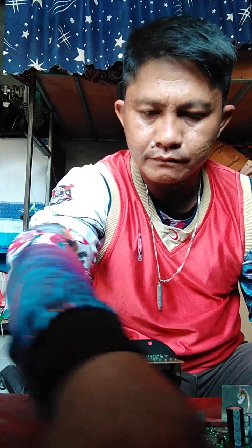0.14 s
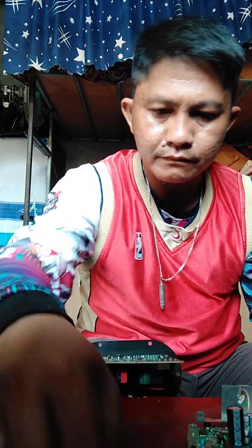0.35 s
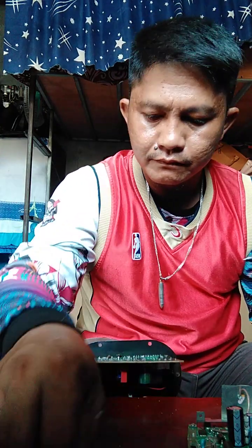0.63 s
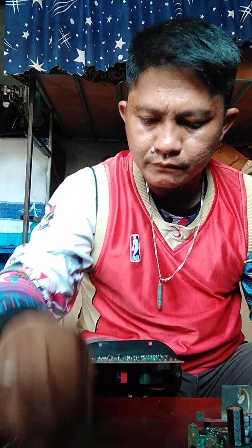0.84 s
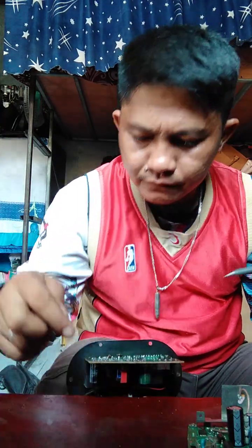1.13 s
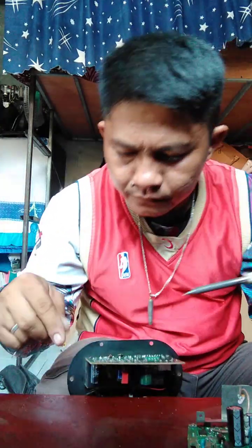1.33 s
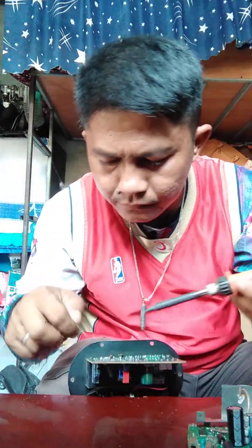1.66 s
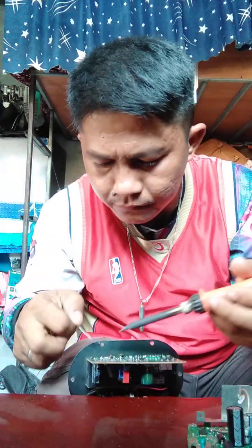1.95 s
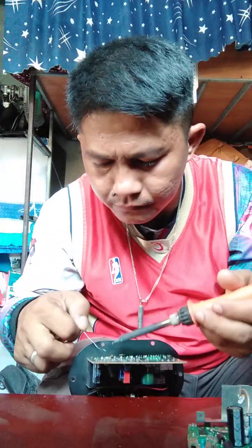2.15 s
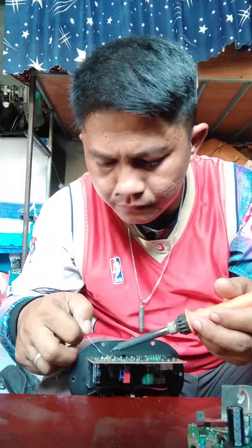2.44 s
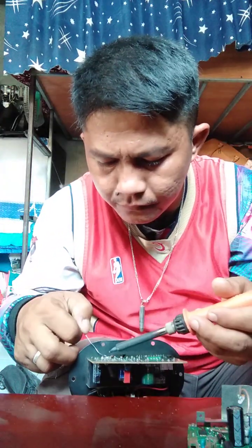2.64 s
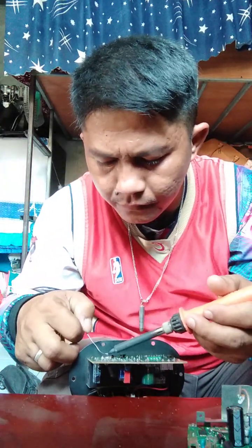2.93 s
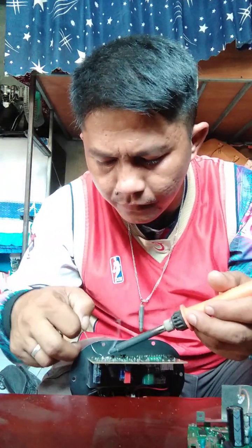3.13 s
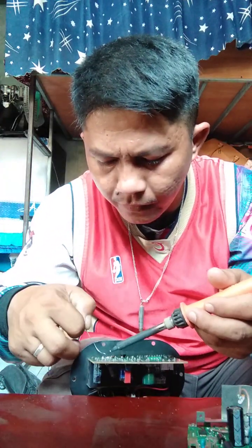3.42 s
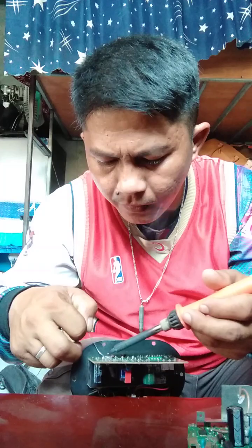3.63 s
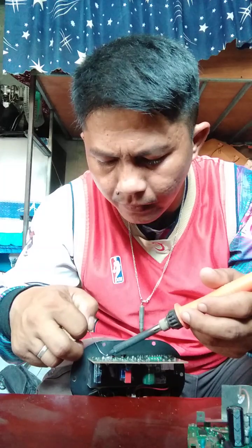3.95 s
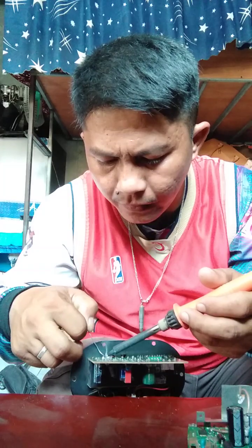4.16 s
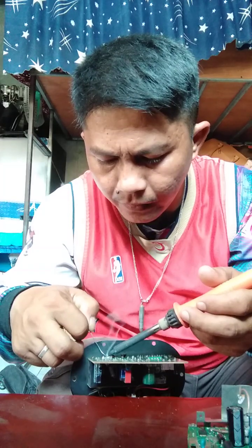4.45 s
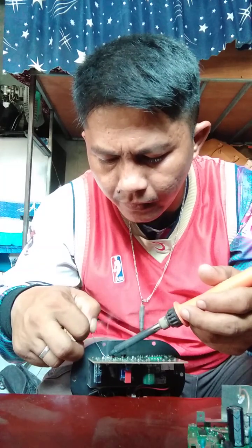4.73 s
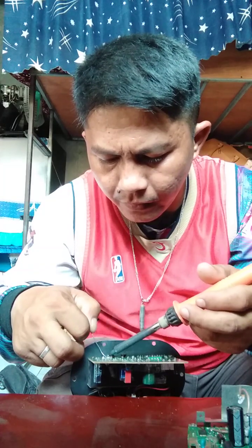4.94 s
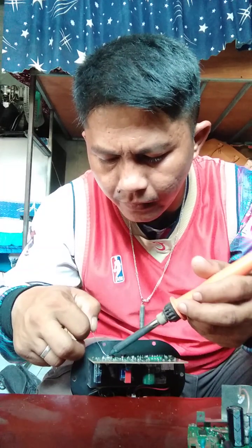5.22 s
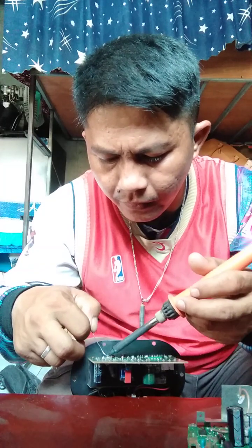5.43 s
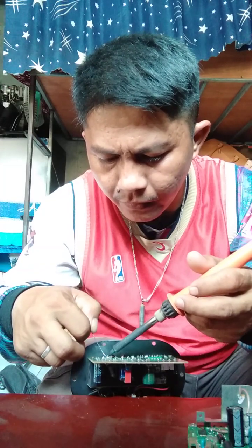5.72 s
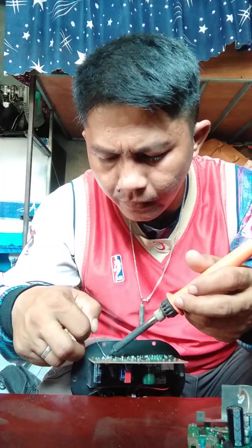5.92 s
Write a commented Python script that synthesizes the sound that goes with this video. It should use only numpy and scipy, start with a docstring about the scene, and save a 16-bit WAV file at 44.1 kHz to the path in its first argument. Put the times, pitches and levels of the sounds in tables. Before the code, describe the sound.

A close microphone in a small, slightly reverberant room with faint air and a low hum. From 0 to 0.7 s a hand and sleeve brush past: low soft thumps, rubbing cloth, a hissy stroke with a crisp snap near 0.27 s, and dull table knocks around 0.65 s. Fingers scuff grittily, then at about 1.0 s solder is dragged up with a bright, sharp click. From there, soft hollow plastic bumps come irregularly, with little creaks and tiny ticks of wire and iron on a circuit board, densest around 2.0-2.2 s, over patchy mid-band noise. Near 2 s a distant shrill sizzle emerges, like a disc cutting metal; it sputters, swells around 4.3 s, dips, then is strongest from 5 to 5.7 s, its pitch sagging and its tones singing more clearly. It still whines and fizzes at the end, 6 s, with a faint final brush.

```python
"""A hand and sleeve brush past the microphone indoors and pick up solder with a click: noise strokes, scuffs, cracks.
Then the hands nudge a hollow plastic case on the work table, where wire and iron tick on its circuit board:
damped modes driven by short noise bursts, with patchy, wavering mid-band noise between them.
A shrill, sizzling whine swells and sags in pitch, most likely a cutting disc biting into metal some way off:
overtones of its turning speed plus noise. Room air and a low hum lie beneath."""
import sys
import numpy as np
from scipy import signal
from scipy.fft import rfft, irfft, next_fast_len
from scipy.io import wavfile
from scipy.ndimage import uniform_filter1d, map_coordinates

SR = 44100
rng = np.random.default_rng(int(sys.argv[2]) if len(sys.argv) > 2 else 0)


def inscribe(sig):
    """Save sig as 16-bit PCM at rate SR to the path in sys.argv[1].

    A 1-D sig is mono; a 2-D sig holds one channel per row.
    Samples are clipped to [-1, 1] before scaling.
    """
    pcm = np.round(np.clip(np.atleast_2d(sig).T, -1, 1) * 32767)
    wavfile.write(sys.argv[1], SR, pcm.astype(np.int16))


N = 268304
TIME_S = np.arange(N) / SR

# Steady hum tones. Each row: frequency in Hz, rms level in dB before a random wobble.
HUM_TONES = [(53.8, -74.5), (113.0, -77)]
# Spectrum of the room air. Each row: frequency in Hz, relative density in dB per Hz.
AIR_SPECTRUM = [(18, -72), (30, -46), (59, -9), (178, -9.5), (301, -2), (459, -12), (838, -18),
                (1990, -22.5), (2390, -23.5), (2660, -26.5), (4860, -22.5), (7390, -24.5), (15800, -52)]
# Decay of the room. Each row: frequency in Hz, t60 in seconds.
ROOM_DECAY = [(200, 0.49), (2000, 0.37), (7000, 0.25), (14000, 0.25)]
# Colour of the blotchy mid-band noise. Each row: frequency in Hz, relative density in dB per Hz.
BLOTCH_SPECTRUM = [(600, -12), (1000, -10), (1700, -9.5), (2500, -4.5), (3300, -2), (4500, -28.5)]
# Course of the blotchy mid-band noise. Each row: time in seconds, level in dB before a trim and wobble.
BLOTCH_LEVEL_CURVE = [(0.8, -75), (1.2, -72), (1.55, -77.5), (1.9, -72.5), (2.2, -73.5), (3.0, -65),
                      (3.6, -72.5), (3.9, -66.5), (4.25, -66), (4.55, -72.5), (5.0, -73), (5.3, -71.5),
                      (5.6, -69.5), (5.8, -72.5), (6.08, -64)]

# Turning speed of the disc, slowing under load. Each row: time in seconds, turns per second.
DISC_SPEED = [(1.8, 163.8), (2.2, 161.4), (2.72, 156.4), (3.25, 150.1), (3.81, 149.3), (4.51, 145.3),
              (5.07, 145.2), (5.25, 143.2), (5.51, 142.8), (5.72, 143.43)]
# How hard the disc bites. Each row: time in seconds, whine level in dB before a common trim.
BITE_LEVEL = [(1.2, -72.5), (1.7, -77), (2.0, -62), (2.3, -56), (2.65, -58), (3.0, -57), (3.45, -54),
              (3.75, -51), (3.98, -51), (4.3, -47), (4.6, -53), (4.92, -51.5), (5.08, -45.5), (5.24, -45),
              (5.42, -48.5), (5.68, -44.5), (6.08, -52.5)]
# Treble of the whine over the rest. Each row: time in seconds, relative level in dB before a common trim.
TREBLE_LEVEL = [(2.62, -6), (2.95, 2.5), (3.35, -2.5), (3.8, 5), (4.3, 1), (4.6, -2.5), (4.95, 4.5),
                (5.65, -3), (6.08, 6.5)]
# Registers of the whine, low, middle and high. Each row: frequency in Hz, relative density in dB per Hz.
WHINE_LOW_SPECTRUM = [(2300, -65), (2700, -43), (2900, -19.5), (3150, -22), (3600, -13.5), (3900, 3.5),
                      (4300, 1), (4600, 2.5), (4900, 3), (5200, -29), (5800, -72)]
WHINE_MID_SPECTRUM = [(4200, -55), (5050, 0.5), (5400, 4), (5850, 4), (6050, 3.5), (6400, 3.5),
                      (6750, -17.5), (7600, -95)]
WHINE_HIGH_SPECTRUM = [(5800, -36), (6700, -7.5), (6950, 0.5), (7800, -1), (8200, -0.5), (8500, -6),
                       (9200, -8), (9650, -14.5), (11000, -66)]
# Topmost fizz of the cut. Each row: frequency in Hz, relative density in dB per Hz.
FIZZ_SPECTRUM = [(8000, -43), (9650, -12), (9850, -0.5), (10150, -13), (10450, 2.5), (11150, -3.5),
                 (11500, -2.5), (12300, -5.5), (14500, -10.5), (15700, -7.5)]
# Course of the fizz. Each row: time in seconds, rms level in dB.
FIZZ_LEVEL_CURVE = [(1.7, -88), (2.2, -75.5), (2.6, -71), (2.95, -63.5), (3.3, -66.5), (3.8, -61),
                    (4.25, -58.5), (4.65, -62), (5.2, -58.5), (5.5, -63.5), (6.08, -59)]
# Overtones of the singing disc. Each row: multiple of the turning speed, relative level in dB.
CHORD_LINES = [(20, -21), (27, -7), (29, -8), (30, -9.5), (34, -5), (37, -10), (39, -34), (40, 0.5),
               (44, -14), (48, -13.5), (50, -29), (54, -25)]
# Single overtones that swell and fade.
# Each row: start in seconds, end in seconds, multiple of the turning speed, level in dB before a common trim.
WHISTLE_LINES = [(1.62, 1.814, 33, -67.5), (1.856, 2.147, 48, -70), (1.92, 2.55, 69, -75.5),
                 (2.4, 3.15, 71, -73), (2.35, 2.75, 62, -72), (2.7, 3.1, 63, -71), (2.653, 3.1, 57, -75),
                 (2.825, 3.1, 50, -57), (3.3, 4.0, 73, -67.5), (1.76, 1.9, 25, -75), (1.854, 2.28, 35, -67),
                 (2.0, 2.4, 50, -64.5), (2.043, 2.303, 38, -63.5), (2.083, 2.6, 34, -58.5),
                 (2.25, 2.62, 36, -56), (2.25, 2.65, 39, -67), (2.36, 3.05, 25, -60),
                 (2.503, 3.053, 34, -60), (2.618, 3.3, 37, -60), (2.677, 3.122, 52, -58),
                 (2.797, 3.123, 48, -55), (3.077, 3.902, 26, -58.5), (3.2, 3.6, 31, -62),
                 (3.247, 3.68, 23, -62), (3.15, 3.75, 27, -61), (2.1, 2.9, 33, -62.5), (2.45, 3.1, 38, -65),
                 (3.336, 4.105, 30, -56.5), (3.5, 4.3, 42, -59), (3.6, 4.2, 52, -57),
                 (3.604, 4.048, 58, -57), (3.698, 4.517, 28, -58.5), (3.964, 4.505, 37, -56),
                 (4.002, 4.38, 44, -57), (4.044, 5.1, 54, -69), (4.498, 4.95, 43, -67),
                 (4.1, 4.42, 25, -58.5), (4.2, 5.0, 32, -58.5), (4.42, 4.75, 25, -65.5),
                 (4.65, 4.97, 24, -72), (5.03, 5.24, 25, -63), (4.43, 5.015, 20, -67.5),
                 (5.146, 5.404, 20, -63.5), (5.41, 5.66, 15, -68), (4.445, 5.004, 37, -60.5),
                 (4.5, 5.0, 49, -62), (4.9, 5.4, 50, -68), (4.895, 5.6, 34, -55), (4.917, 5.6, 32, -52.5),
                 (4.95, 5.3, 27, -57.5), (4.95, 5.602, 29, -62), (4.97, 5.3, 40, -48.5),
                 (5.0, 5.38, 30, -49), (5.093, 5.593, 48, -50.5), (5.168, 5.68, 45, -45),
                 (5.197, 5.7, 69, -61), (5.248, 6.4, 54, -52)]

# Wire and iron touch the board. Each row: time in seconds, level in dB before a common trim, centre in Hz.
BOARD_TICKS = [(0.779, -54.5, 2260), (1.166, -55, 2370), (1.791, -53.5, 4150), (1.793, -54, 1650),
               (1.822, -52.5, 1960), (1.995, -54, 1700), (2.161, -47.5, 1810), (2.035, -50, 3430),
               (2.0402, -54, 1770), (2.126, -46.5, 3150), (2.152, -43, 2330), (2.182, -46, 2240),
               (2.4303, -51, 2760), (2.574, -50.5, 2440), (2.893, -52.5, 2460), (3.333, -49.5, 3180),
               (3.425, -50.5, 1960), (3.5373, -50, 3400), (3.708, -56.5, 2460), (4.079, -50.5, 1740),
               (4.238, -50, 2480), (4.402, -52.5, 2370), (4.9397, -49, 3120), (5.2692, -48, 2800)]
# Modes of the circuit board. Each row: frequency in Hz, relative level in dB, t60 in seconds.
BOARD_MODES = [(1746, 16.5, 0.043), (1915, 8, 0.04), (2207, -2.5, 0.094), (2467, 9, 0.12), (3090, 8.5, 0.1),
               (3414, 4.5, 0.076), (4110, 12.5, 0.048)]

# Firm nudges of the case. Each row: time in seconds, level in dB before a common trim.
CASE_NUDGES = [(0.755, -39.5), (0.807, -47), (0.848, -49.5), (1.055, -42.5), (1.089, -50.5), (1.175, -48.5),
               (1.332, -45.5), (1.377, -47), (1.421, -45.5), (1.529, -44), (1.627, -45), (1.963, -45.5),
               (2.027, -41), (2.087, -47), (2.171, -40), (2.299, -48.5), (2.635, -46.5), (2.766, -43),
               (2.828, -47), (2.924, -41), (3.027, -50.5), (3.248, -53.5), (3.353, -41), (3.608, -41.5),
               (3.7, -44), (3.771, -48.5), (3.836, -41), (3.864, -40.5), (4.14, -45), (4.413, -55),
               (4.816, -48.5), (5.0, -53.5), (5.092, -55.5), (5.278, -51.5), (5.563, -55.5), (5.705, -58),
               (5.835, -51.5), (5.96, -50), (6.035, -51)]
# Upper modes of the case. Each row: frequency in Hz, width in Hz, mean relative level in dB.
CASE_UPPER_MODES = [(609, 55, 20.5), (793, 63, -6), (900, 12, 7), (1110, 33, -26)]
# The case creaks when pressed. Each row: start in seconds, direct peak in dB, pitch in Hz, slip length in seconds.
CASE_CREAKS = [(0.727, -46.5, 630, 0.038), (1.101, -56.5, 640, 0.077), (1.389, -57.5, 733, 0.08),
               (1.946, -51.5, 480, 0.032), (2.159, -47.5, 392, 0.084), (2.384, -58, 552, 0.11),
               (3.783, -52, 720, 0.04), (3.929, -44.5, 397, 0.084), (4.033, -46.5, 577, 0.054),
               (4.202, -56.5, 770, 0.06), (4.97, -61.5, 810, 0.035), (5.158, -59, 612, 0.049),
               (5.269, -57, 836, 0.037)]

# Dull blows on the table. Each row: start in seconds, direct peak in dB, pitch in Hz, t60 in seconds.
TABLE_KNOCKS = [(0.0, -38, 212.5, 0.061), (0.066, -36, 217.3, 0.05), (0.089, -40, 198, 0.1),
                (0.262, -39.5, 190, 0.04), (0.305, -43, 252, 0.087), (0.49, -37.5, 331, 0.12),
                (0.636, -32, 197, 0.027), (0.65, -34, 217, 0.025), (0.984, -49.5, 402, 0.16),
                (1.011, -53, 688, 0.15), (2.195, -42, 265.4, 0.05), (2.668, -46.5, 257, 0.14),
                (3.5, -48.5, 237, 0.08), (3.89, -39.5, 253, 0.11), (4.914, -42, 253, 0.1),
                (5.358, -47, 260, 0.069), (5.83, -50, 232, 0.093), (5.95, -51.5, 169, 0.1),
                (5.991, -52, 240, 0.1)]
# Sharp clicks of things picked up. Each row: start in seconds, direct peak in dB, t60 in seconds.
PICKUP_CLICKS = [(0.651, -43, 0.025), (0.703, -45, 0.02), (1.0118, -22, 0.0065), (1.022, -40, 0.02),
                 (1.497, -58, 0.022)]
# Colour of the clicks. Each row: frequency in Hz, relative level in dB.
CLICK_SPECTRUM = [(300, -28), (700, 7), (1400, -6), (2200, -3), (3400, -9), (4500, 2), (5200, -12),
                  (6900, 4), (7700, -15), (9000, 2), (12300, -2), (13700, -11), (14500, -5), (15500, -11)]

# Fingers scuff the table, then drag the solder off it.
# Each row: start in seconds, direct peak in dB, grit t60 in seconds, tilt in dB per octave, what rings.
FINGER_SCUFFS = [(0.648, -42, 0.05, -0.5, "table"), (0.681, -41.5, 0.13, -2.5, "table"),
                 (0.703, -40, 0.18, 3, "table"), (0.749, -47.5, 0.13, 0, "table"),
                 (0.776, -52, 0.11, 0, "table"), (0.950, -39, 0.08, 1, "solder"),
                 (0.971, -39.5, 0.11, 0.5, "solder"), (0.985, -34.5, 0.08, -3, "solder"),
                 (0.997, -34.5, 0.05, -1.5, "solder"), (1.005, -35, 0.033, 4, "solder"),
                 (1.012, -29, 0.025, -1, "solder"), (1.021, -33, 0.068, -3.5, "solder"),
                 (1.045, -45, 0.12, -4.5, "solder")]
# Resonances of the scuffed table and solder. Each row: frequency in Hz, width in Hz, relative level in dB.
TABLE_MODES = [(985, 98, 7.5), (2447, 55, 11), (2915, 40, 14), (3940, 200, 1), (4720, 86, 8),
               (5800, 200, -3), (6700, 80, 3), (7080, 93, -3), (7470, 100, 4), (8500, 90, -1),
               (9050, 170, -3), (10200, 700, -6), (12100, 700, -16), (14400, 500, -21)]
SOLDER_MODES = [(740, 80, 4.5), (1090, 170, 3), (2240, 270, 9), (2930, 92, 5), (3760, 150, 5.5),
                (4490, 140, 4.5), (5800, 130, 3), (6300, 220, 9), (6950, 140, 13), (8360, 150, -2),
                (9200, 240, -8), (10500, 700, -14), (12100, 700, -15), (14500, 600, -20)]

# The sleeve catches and lets go.
# Each row: start in seconds, direct peak in dB, centre in Hz, width in Hz, slip t60 in seconds.
SLEEVE_SNAGS = [(0.006, -45.5, 1760, 400, 0.1), (0.024, -45, 2400, 500, 0.07),
                (0.125, -50, 6800, 400, 0.12), (0.163, -44, 13400, 4000, 0.11),
                (0.166, -37.5, 3900, 700, 0.09), (0.194, -41, 3800, 900, 0.04),
                (0.227, -42, 1310, 300, 0.13), (0.252, -35, 7040, 1100, 0.05),
                (0.2722, -26, 7300, 900, 0.011), (0.295, -44, 3100, 600, 0.05),
                (0.32, -38, 6060, 1500, 0.046), (0.357, -44, 1482, 350, 0.07),
                (0.363, -39, 4400, 900, 0.04), (0.425, -62, 910, 199, 0.08), (0.458, -45, 860, 250, 0.13),
                (0.49, -41, 2900, 700, 0.06), (0.585, -55, 2900, 160, 0.3), (0.545, -41, 580, 151, 0.075)]
# Strokes of hand and sleeve. Each row: full from in seconds, until in seconds, rise in seconds,
# then the levels of body, rub and hiss in dB before a trim for each.
SLEEVE_STROKES = [(0.0, 0.023, 0.02, -38.5, -42, -58), (0.053, 0.069, 0.078, -34.5, -63, -64),
                  (0.179, 0.19, 0.22, -68, -55.5, -49), (0.24, 0.34, 0.14, -41, -43.5, -41.5),
                  (0.485, 0.53, 0.07, -37.5, -40, -60.5), (0.643, 0.67, 0.027, -43.5, -70, -60.5),
                  (6.016, 6.14, 0.12, -49, -68, -87)]
# Spectra of a stroke's body, rub and hiss. Each row: frequency in Hz, relative density in dB per Hz.
BODY_SPECTRUM = [(53, -44), (90, -9), (188, 0.5), (303, 7), (410, -6.5), (550, -28), (600, -5.5),
                 (780, -66), (1320, -120)]
RUB_SPECTRUM = [(240, -45), (400, 2.5), (750, 1), (1050, -9.5), (1300, -2.5), (1700, 3.5), (2000, -3.5),
                (2250, -3.5), (2580, -8.5), (2950, 3), (3500, -11), (3950, -1.5), (4400, -5.5), (5300, -7),
                (6500, -17), (7200, -39), (7900, -16), (8500, -39)]
HISS_SPECTRUM = [(2350, -14), (3900, -3.5), (5010, -6), (5900, -2), (6400, -7), (6950, 2.5), (7700, -3.5),
                 (8300, -9), (9400, -18), (10200, -14.5), (13800, -23), (15800, -29)]

WORK_START_S, WORK_END_S = 1.5, 6.08  # light touches fall in this span
STROKE_RISE_DB = 41  # climb of a stroke within its rise time
STROKE_FALL_DB_PER_S = (153, 155, 198)  # body, rub, hiss
CASE_HZ, CASE_SCATTER_HZ = 297.5, 17.4  # the low mode shifts a little with the grip
CASE_UPPER_PEAK_DB, CASE_UPPER_SCATTER_DB = -72, 5.5
ROCK_DELAY_S, ROCK_CHANGE_DB, ROCK_HZ = 0.031, -8.5, 259.2  # the case rocks back, softer and lower
FULL_DEPTH = 0.57  # relative depth of cut at which the low register is full
SING_FULL_S, SING_RISE_DB_PER_S, SING_DB = 5.72, 82, -43.5
RASP_HZ_PER_MULTIPLE = 2.8  # noise knots per second; higher whistles rasp in wider bands
RASP_SHARE = (0.83, 0.13)  # noisy power of a whistle up to FULL_DEPTH and in the deepest cut
BAND_LIMIT_HZ = 15780


def amp(db):
    """Decibels to gain."""
    return 10 ** (np.asarray(db) / 20)


def unit(x):
    """Scale to rms 1."""
    return x / np.sqrt(np.mean(x ** 2) + 1e-20)


def peaked(x):
    """Scale to peak 1."""
    return x / (np.abs(x).max() + 1e-20)


def curve(rows):
    """(seconds, value) points as one value per sample."""
    return np.interp(TIME_S, *np.transpose(rows))


def along(points, hz):
    """(Hz, value) points read on a log frequency axis."""
    point_hz, value = np.transpose(points)
    return np.interp(np.log(hz + 1), np.log(point_hz + 1), value)


def wobble(rate_hz):
    """A smooth random curve with rate_hz knots per second."""
    knots = rng.standard_normal(int(N * rate_hz / SR) + 4)
    coarse_s = TIME_S[::32]
    return np.interp(TIME_S, coarse_s, map_coordinates(knots, [coarse_s * rate_hz]))


def filtered(x, response):
    """x times a response of frequency in Hz."""
    size = next_fast_len(len(x) + 8192)
    spectrum = rfft(x, size) * response(np.fft.rfftfreq(size, 1 / SR))
    return irfft(spectrum, size)[:len(x)]


def coloured(x, spectrum):
    """x shaped by a (Hz, dB) spectrum, at rms 1."""
    return unit(filtered(x, lambda hz: amp(along(spectrum, hz))))


def resonate(x, modes):
    """x through parallel (Hz, width in Hz, dB) resonances."""
    def response(hz):
        return sum(amp(db) * 1j * hz * width / (centre * centre - hz * hz + 1j * hz * width)
                   for centre, width, db in modes)
    return filtered(x, response)


def patchy(x, depth_db, width_hz, rate_hz, pitch=None):
    """Random spectral peaks and hollows that come and go, sliding along with a pitch ratio if given."""
    hz, t, z = signal.stft(x, SR, nperseg=1024)
    slide = np.ones(len(t)) if pitch is None else np.interp(t, TIME_S, pitch)
    place = np.broadcast_arrays(hz[:, None] / slide / width_hz, t * rate_hz)
    field = map_coordinates(rng.standard_normal((256, 256)), place, mode="wrap")
    depth = np.interp(t, TIME_S, depth_db * np.ones(N))
    gain = amp(depth * 1.5 * np.tanh(field))
    gain /= np.sqrt(np.mean(gain ** 2, axis=0))  # mean power gain 1 at each moment
    return signal.istft(z * gain, SR, nperseg=1024)[1][:N]


def steady(x):
    """Hold the rms near 1 over each tenth of a second."""
    return x / np.sqrt(np.abs(uniform_filter1d(x ** 2, size=SR // 10)) + 1e-12)


def add(track, start_s, sound):
    """Mix a sound into the track."""
    part = track[max(round(start_s * SR), 0):][:len(sound)]
    part += sound[:len(part)]


def room(x):
    """Diffuse room tail: noise in which each frequency dies at its own speed."""
    hz, t, z = signal.stft(rng.standard_normal(SR // 2), SR, nperseg=256)
    decay = amp(-60 * t / along(ROOM_DECAY, hz)[:, None])
    tail = signal.istft(z * decay, SR, nperseg=256)[1]
    return signal.fftconvolve(x, tail / np.linalg.norm(tail))[:N]


def light_touches(db, scatter_db, count):
    """(seconds, dB) rows spread loosely over the time of work."""
    place, size = rng.random((count, 2)).T
    times_s = WORK_START_S + (WORK_END_S - WORK_START_S) * (np.arange(count) + place) / count
    return list(zip(times_s, db + scatter_db * (2 * size - 1)))


def background():
    """Quiet room air as coloured noise, and a low hum of slightly unsteady sines."""
    air = amp(-69.0) * coloured(rng.standard_normal(N), AIR_SPECTRUM)
    hum = np.zeros(N)
    for hz, db in HUM_TONES:
        level = np.sqrt(2) * amp(db + 2.3 * wobble(6.9))
        hum += level * np.sin(2 * np.pi * hz * TIME_S + 0.6 * wobble(7.8))
    return hum + air


def blotches():
    """Blotchy mid-band noise: random spectral patches come and go while the level wavers."""
    noise = patchy(rng.standard_normal(N), depth_db=11, width_hz=150, rate_hz=30) * amp(3 * wobble(70))
    level = amp(curve(BLOTCH_LEVEL_CURVE) - 1.5 + 2.5 * wobble(9))
    return level * coloured(noise, BLOTCH_SPECTRUM)


def singing(phase, depth):
    """Overtones meeting the disc's own modes stand out, raspy in a light cut and cleaner in a deep one."""
    chord = sum(amp(db + wobble(7.8)) * np.sin(round(k) * phase + 2 * np.pi * rng.random())
                for k, db in CHORD_LINES)
    before_full_s = np.maximum(SING_FULL_S - TIME_S, 0)
    out = amp(SING_DB - SING_RISE_DB_PER_S * before_full_s) * chord
    rasp = np.interp(depth, [FULL_DEPTH, 1], RASP_SHARE)
    waver_rad = np.interp(depth, [0.8, 1], [2.1, 0.45])
    for start_s, end_s, k, db in WHISTLE_LINES:
        on = (TIME_S > start_s) & (TIME_S < end_s)
        swell = np.sqrt(np.abs(np.sin(np.pi * (TIME_S[on] - start_s) / (end_s - start_s))))
        swell *= amp(3 * rasp[on] * wobble(24)[on])
        turn = round(k) * phase[on] + waver_rad[on] * wobble(14)[on]
        noise_hz = RASP_HZ_PER_MULTIPLE * k
        noisy = (wobble(noise_hz)[on] * np.sin(turn) + wobble(noise_hz)[on] * np.cos(turn)) / np.sqrt(2)
        line = np.sqrt(1 - rasp[on]) * np.sin(turn) + np.sqrt(rasp[on]) * noisy
        out[on] += amp(db - 1.0) * swell * line
    return np.sqrt(2) * out


def disc():
    """One scrape a turn, heard through echoes, plus grit; a deeper cut is slower, fuller and steadier."""
    turns_hz = curve(DISC_SPEED)
    depth = (turns_hz.max() - turns_hz) / np.ptp(turns_hz)  # 0 at first touch, 1 in the deepest cut
    speed_hz = turns_hz * (1 + 0.00049 * wobble(12))
    phase = 2 * np.pi * np.cumsum(speed_hz) / SR
    # pulse train: equal overtones up to the 100th
    scrapes = unit(np.sin(100.5 * phase) / (np.sin(phase / 2) + 1e-12))
    grit_share = np.interp(depth, [0, 1], [0.8, 0.3])
    cut = np.sqrt(1 - grit_share) * unit(room(scrapes)) + np.sqrt(grit_share) * rng.standard_normal(N)

    fizz = steady(coloured(patchy(cut, 4, width_hz=120, rate_hz=8), FIZZ_SPECTRUM))
    fizz *= amp(curve(FIZZ_LEVEL_CURVE))

    # a light touch sputters in narrow bands, a deep cut fills them in
    gaps_db = np.interp(depth, [0, .6, .9, 1], [7.5, 6.5, 6.5, 3.5])
    sputter_db = np.interp(depth, [0, .7, 1], [8.5, 5, 1.5])
    cut = patchy(cut, gaps_db, width_hz=105, rate_hz=4, pitch=speed_hz / speed_hz[-1])
    cut = patchy(cut, sputter_db, width_hz=150, rate_hz=27)

    low_db = np.interp(depth, [0, FULL_DEPTH], [-13, -2.2])
    whine = amp(low_db) * steady(coloured(cut, WHINE_LOW_SPECTRUM))
    whine += amp(-1.5) * steady(coloured(cut, WHINE_MID_SPECTRUM))
    whine += amp(curve(TREBLE_LEVEL) - 2.5) * steady(coloured(cut, WHINE_HIGH_SPECTRUM))
    return amp(curve(BITE_LEVEL) - 0.7) * whine + fizz + singing(phase, depth)


def board():
    """Short soft scrapes ring the board's modes near each contact's pitch."""
    out, t = np.zeros(N), np.arange(SR // 6) / SR
    light = [(s, db, rng.choice([mode[0] for mode in BOARD_MODES]))
             for s, db in light_touches(-59.5, scatter_db=3, count=13)]
    for s, db, centre_hz in BOARD_TICKS + light:
        detune = rng.normal(1, .03, len(BOARD_MODES))
        ring = np.zeros(len(t))
        for (hz, level_db, t60_s), ratio in zip(BOARD_MODES, detune):
            distance_db = 42 * abs(np.log2(hz / centre_hz))  # modes far from the contact's pitch are weak
            ring += amp(level_db - distance_db - 60 * t / t60_s) * np.sin(2 * np.pi * hz * ratio * t)
        scrape = rng.standard_normal(len(t)) * t * np.exp(-t / 0.0055)
        tick = signal.fftconvolve(ring, scrape)[:len(t)]
        add(out, s - .008, amp(db - 1.5) * peaked(tick))
    return out + amp(-4.5) * room(out)


def case():
    """Nudges swell and die in the hollow case's low mode and stir its upper ones; presses creak as noise slips."""
    out, t = np.zeros(N), np.arange(SR // 4) / SR
    swell = peaked(t ** 0.72 * np.exp(-t / 0.013))
    light = light_touches(-67, scatter_db=2.0, count=10)
    pushes = [(s, db, CASE_HZ) for s, db in CASE_NUDGES + light]
    returns = [(s + ROCK_DELAY_S, db + ROCK_CHANGE_DB, ROCK_HZ) for s, db in CASE_NUDGES]
    for s, db, pitch_hz in pushes + returns:
        hz = pitch_hz + CASE_SCATTER_HZ * rng.standard_normal()
        upper_db = CASE_UPPER_PEAK_DB + CASE_UPPER_SCATTER_DB * rng.standard_normal()
        low, upper = t * np.exp(-t / 0.0082) * rng.standard_normal((2, len(t)))
        boom = swell * np.sin(2 * np.pi * (hz * t + rng.random()))
        rub = resonate(resonate(low, [(287, 120, 0)]), [(300, 44, 0)])
        # the point of contact decides which upper modes answer
        modes = [(centre, width, level + rng.normal(0, 10.4)) for centre, width, level in CASE_UPPER_MODES]
        ring = resonate(resonate(upper, modes), [(735, 110, 0)])
        nudge = amp(db - 2.5) * (boom + amp(-5.5) * peaked(rub))
        add(out, s - .003, nudge + amp(upper_db) * peaked(ring))
    for s, db, hz, length_s in CASE_CREAKS:
        slip = rng.standard_normal(len(t)) * np.sin(np.pi * np.minimum(t / length_s, 1))
        mode = [(hz, 75, 0)]
        add(out, s, amp(db) * peaked(resonate(resonate(slip, mode), mode)))
    return out + amp(-6.0) * room(out)


def knocks():
    """The table top answers a soft blow with one damped low mode."""
    out, t = np.zeros(N), np.arange(SR // 3) / SR
    soft_onset = 1 - np.exp(-t / 0.0085)
    for s, db, hz, t60_s in TABLE_KNOCKS:
        mode = np.sin(2 * np.pi * hz * t) * amp(-60 * t / t60_s)
        add(out, s, amp(db) * peaked(mode * soft_onset))
    return out + amp(-7.0) * room(out)


def clicks():
    """Hard contacts: short cracks of decaying coloured noise and their room tail."""
    out, t = np.zeros(N), np.arange(SR // 4) / SR
    for s, db, t60_s in PICKUP_CLICKS:
        crack = coloured(rng.standard_normal(len(t)), CLICK_SPECTRUM) * amp(-60 * t / t60_s)
        add(out, s, amp(db) * peaked(crack))
    return out + amp(-6.0) * room(out)


def scuffs():
    """Brief gritty slips ring the table top or the solder, and the room answers."""
    out, t = np.zeros(N), np.arange(SR // 5) / SR
    rings = {"table": TABLE_MODES, "solder": SOLDER_MODES}
    for s, db, t60_s, tilt_db, thing in FINGER_SCUFFS:
        roughness_db = 4.2 * rng.standard_normal(len(t))
        grit = rng.standard_normal(len(t)) * amp(roughness_db - 60 * t / t60_s)
        grit = filtered(grit, lambda hz: amp(tilt_db * np.log2((hz + 500) / 4000)))
        add(out, s, amp(db) * peaked(resonate(grit, rings[thing])))
    return out + amp(-5.5) * room(out)


def snags():
    """Each catch of the cloth rings briefly in a band of its own."""
    out, t = np.zeros(N), np.arange(SR // 6) / SR
    for s, db, hz, width_hz, t60_s in SLEEVE_SNAGS:
        slip = rng.standard_normal(len(t)) * amp(-60 * t / t60_s)
        mode = [(hz, width_hz, 0)]
        add(out, s, amp(db) * peaked(resonate(resonate(slip, mode), mode)))
    return out + amp(-6) * room(out)


def friction(spectrum, grain_db, grain_hz, patch_hz, catch_share):
    """Fine slipping with crisp little catches, and resonances that shift as the contact moves."""
    slips = patchy(rng.standard_normal(N), depth_db=6.5, width_hz=patch_hz, rate_hz=18)
    slips = unit(slips * amp(grain_db * wobble(grain_hz)))
    catches = rng.standard_normal(N) * (rng.random(N) < 600 / SR)  # about 600 a second
    return coloured(slips + catch_share * unit(catches), spectrum)


def stroke_gains():
    """Gains of body, rub and hiss: each stroke rises, holds and dies away; powers add."""
    power = np.zeros((3, N))
    for start_s, end_s, rise_s, *levels_db in SLEEVE_STROKES:
        early_s, late_s = np.maximum(start_s - TIME_S, 0), np.maximum(TIME_S - end_s, 0)
        near = (early_s < 2 * rise_s) & (late_s < 1)
        for band, db, fall in zip(power, levels_db, STROKE_FALL_DB_PER_S):
            rise_db = STROKE_RISE_DB * early_s[near] / rise_s
            band[near] += amp(db - rise_db - fall * late_s[near]) ** 2
    return np.sqrt(power)


def sleeve():
    """Skin and cloth slide past: friction noise as a low body, a rub and a fine hiss."""
    body, rub, hiss = stroke_gains()
    low = friction(BODY_SPECTRUM, grain_db=-1.0, grain_hz=44, patch_hz=59.0, catch_share=0.18)
    mid = friction(RUB_SPECTRUM, grain_db=0.4, grain_hz=230, patch_hz=149.9, catch_share=0.43)
    high = friction(HISS_SPECTRUM, grain_db=1.0, grain_hz=200, patch_hz=203.6, catch_share=0.27)
    return amp(-4.0) * body * low + amp(-0.23) * rub * mid + amp(-0.3) * hiss * high


def scene():
    """Everything at one microphone."""
    table_work = board() + case() + knocks() + clicks() + scuffs()
    return (background() + blotches() + disc() + table_work + snags() + sleeve())[None]


def record(dry):
    """The recorder keeps nothing above its band limit."""
    return np.array([filtered(channel, lambda hz: hz < BAND_LIMIT_HZ) for channel in dry])


dry = scene()
out = record(dry)
inscribe(out)
```